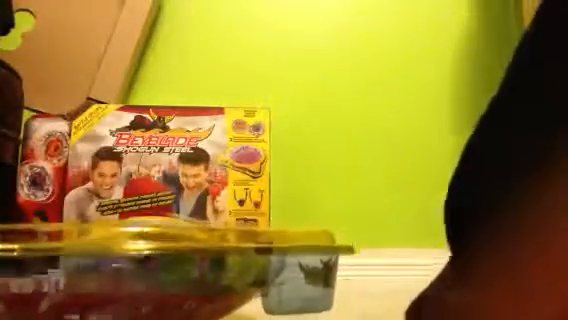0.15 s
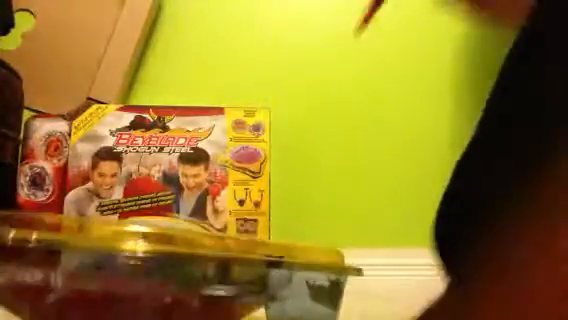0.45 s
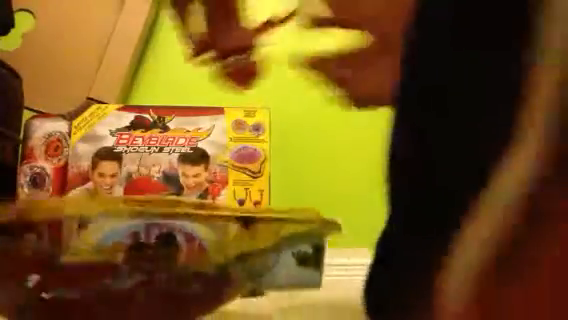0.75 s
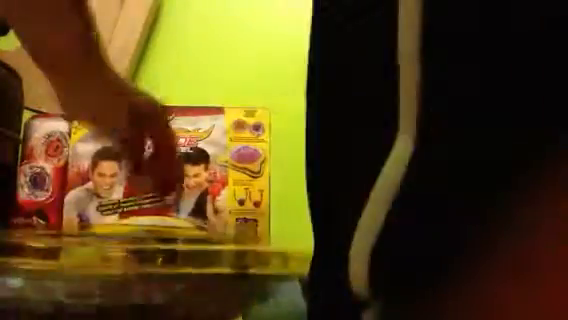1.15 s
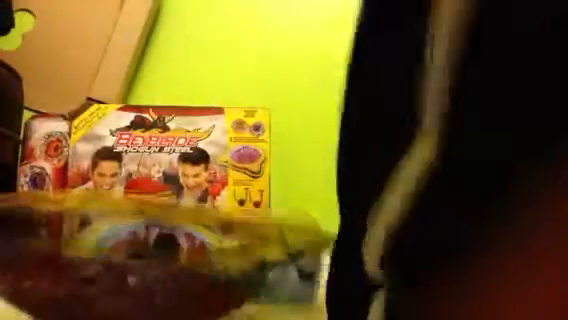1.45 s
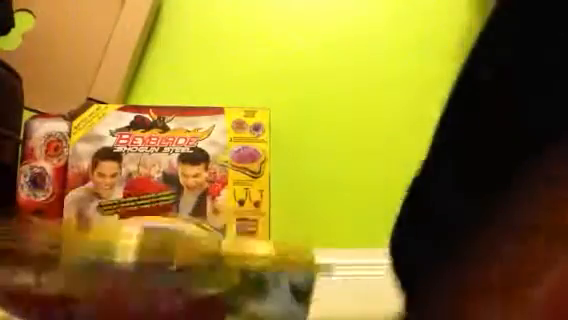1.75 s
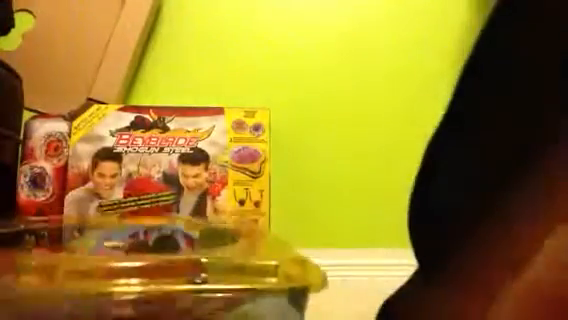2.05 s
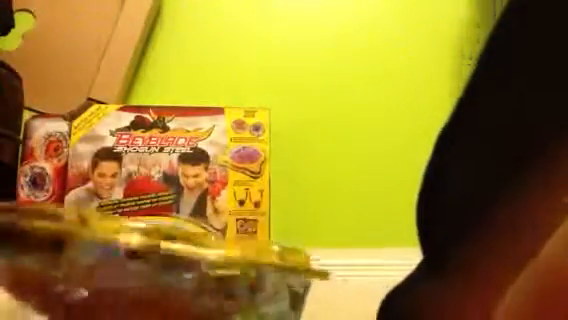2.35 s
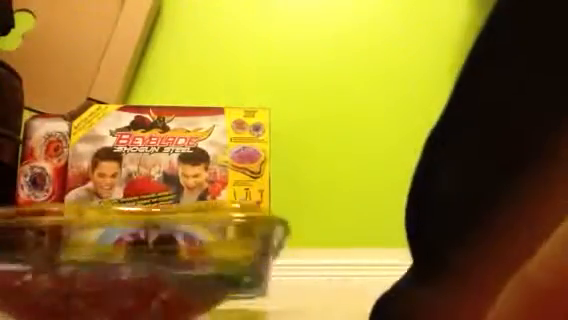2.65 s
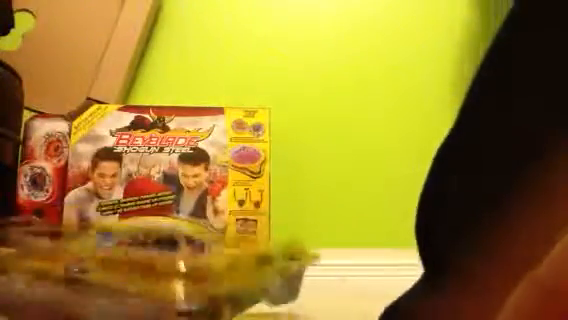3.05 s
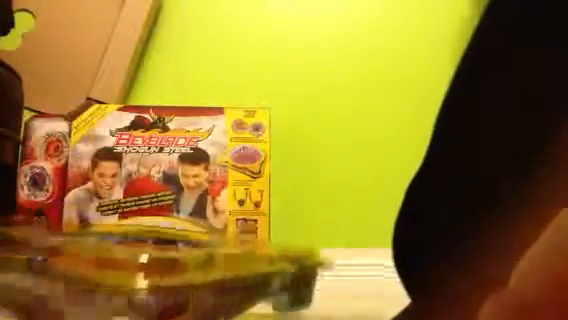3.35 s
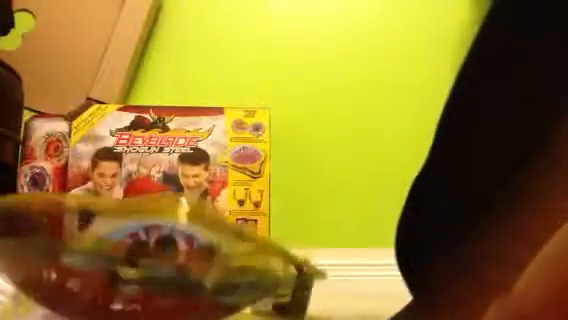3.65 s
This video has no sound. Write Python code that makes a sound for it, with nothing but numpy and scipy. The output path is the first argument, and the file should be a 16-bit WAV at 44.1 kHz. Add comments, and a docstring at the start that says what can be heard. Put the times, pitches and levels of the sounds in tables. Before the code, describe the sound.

A toy top whirrs softly in a plastic arena, a launcher clicks, its toothed cord zips, and a second top drops in; both rattle and knock ever more densely, close to an overloaded microphone in a small room.

```python
"""A whirr is heard first: a toy top runs round a thin plastic arena on the floor of a small room, as a launcher snaps.
A toothed cord rips through the launcher, and a second top drops in and bounces; the two rattle round the dish,
knock against its wall and clash. Friction and impacts are noise grains through the colours of the parts,
with decaying sines for dish, wall and rim. Dense reflections follow; a close, overloaded microphone rounds the peaks."""
import sys
import numpy as np
from scipy import signal
from scipy.fft import rfft, irfft
from scipy.io import wavfile

SR = 44100
rng = np.random.default_rng(int(sys.argv[2]) if len(sys.argv) > 2 else 0)


def wav_record(signal):
    """Record a signal, one row per channel, as 16-bit PCM in the file named by sys.argv[1]."""
    frames = np.transpose(np.atleast_2d(signal))
    bounded = np.clip(frames, -1, 1)
    # unit amplitude maps onto the largest positive 16-bit level
    quanta = np.round(bounded * 32767).astype(np.int16)
    wavfile.write(sys.argv[1], SR, quanta)


N = 167580
TIME = np.arange(N) / SR
SHORT = TIME[:6000]  # time axis of one short sound
LEVEL_S = .01  # a short sound at 0 dB has the energy of unit rms over this time
GRAINS_PER_S = 3200


def from_db(db):
    """Logarithmic level: decibels become an amplitude factor."""
    return 10 ** (np.asarray(db) / 20)


def rms_one(x):
    """Power normalisation: scale to unit rms."""
    return x / np.sqrt(np.mean(x ** 2) + 1e-20)


def unit_burst(x):
    """Energy normalisation: scale a short sound to the energy of unit rms over LEVEL_S."""
    return x / np.sqrt(np.sum(x ** 2) / (LEVEL_S * SR) + 1e-20)


def in_time(rows):
    """Linear interpolation: timed rows become control curves, one value per sample."""
    times_s, *columns = np.transpose(rows)
    return [np.interp(TIME, times_s, column) for column in columns]


def add(out, start_s, x):
    """Superposition: mix x into out from its start time."""
    i = int(start_s * SR)
    out[i:i + len(x)] += x[:N - i]


def body(points, size=4096):
    """Minimum phase: folding the cepstrum gives a causal impulse response with the given colour."""
    points_hz, points_db = np.transpose(points)
    log_hz = np.log(np.fft.rfftfreq(size, 1 / SR) + 1)
    log_gain = np.log(from_db(np.interp(log_hz, np.log(points_hz), points_db)))
    cepstrum = irfft(log_gain)
    cepstrum[1:size // 2] *= 2
    cepstrum[size // 2 + 1:] = 0
    return irfft(np.exp(rfft(cepstrum)))[:size // 2]


def through(x, response):
    """Linear excitation: convolve x with an impulse response."""
    return signal.fftconvolve(x, response)[:len(x)]


def resonate(x, hz, width_hz):
    """Damped resonance: a pole pair whose radius sets the bandwidth."""
    radius = np.exp(-np.pi * width_hz / SR)
    poles = [1, -2 * radius * np.cos(2 * np.pi * hz / SR), radius ** 2]
    return signal.lfilter([1, 0, -1], poles, x)


def grains(count):
    """Asperity noise: sparse tiny impacts of random size and sign over a fainter steady noise."""
    impacts = rng.random(count) < GRAINS_PER_S / SR
    return rng.standard_normal(count) * (0.16 + impacts)


def contact(rise_s, hold_s, fall_s):
    """Contact force: exponential approach from zero, with exponential release after the hold."""
    attack = 1 - np.exp(-SHORT / rise_s)
    release = np.exp(-np.maximum(SHORT - hold_s, 0) / fall_s)
    return attack * release


def blend(tone, noise, share):
    """Energy partition: a short sound of unit energy, mixed with the given energy share for the tone."""
    return unit_burst(np.sqrt(share) * unit_burst(tone) + np.sqrt(1 - share) * unit_burst(noise))


def pulsing(rate, jitter, fall_s, spread_db, floor, count):
    """Quasi-periodic excitation: jittered jolts die away over a steady pressure; rms 1."""
    draws = rng.standard_normal((count, 2))
    at = ((np.arange(count) + jitter * draws[:, 0]) / rate * SR).astype(int)
    keep = (at >= 0) & (at < N)
    jolts = np.zeros(N)
    jolts[at[keep]] = from_db(spread_db * np.clip(draws[keep, 1], -2, 2))
    dying = signal.lfilter([1], [1, -np.exp(-1 / (fall_s * SR))], jolts)
    return rms_one(floor + dying)


# The tips running on the dish, quieter while a top is in the air.
# Each row: time in seconds, level of the rumble in dB, level of the hiss in dB.
RUNNING_LEVELS = [(0, -36, -43), (.17, -33.5, -54), (.3, -29, -45), (.45, -30.5, -46), (.59, -26.5, -41.5),
                  (.68, -33, -50), (.8, -32.5, -50.5), (.97, -33, -53), (1.08, -30.5, -45),
                  (1.3, -32.5, -39), (1.345, -33, -51), (1.42, -21.5, -37), (1.5, -31, -39),
                  (1.545, -28, -51), (1.6, -30, -39), (1.69, -26.5, -48), (1.76, -27, -43),
                  (1.805, -45, -58), (1.84, -29, -47), (2.0, -25, -38.5), (2.12, -25, -44.5),
                  (2.21, -26, -44.5), (2.28, -23, -38), (2.39, -37, -44), (2.55, -26.5, -46),
                  (2.68, -34, -52.5), (2.76, -31.5, -48), (2.83, -26, -45), (3.1, -24, -36.5),
                  (3.33, -27.5, -37.5), (3.43, -31, -44), (3.6, -40, -45), (3.8, -31, -49.5)]
# Colour of the dish's rumble. Each row: frequency in Hz, relative level in dB per Hz.
RUMBLE_COLOUR = [(25, -39), (70, -32), (100, -19.5), (130, -5), (195, 3), (240, 0.5), (310, -6),
                 (400, -5.5), (500, 0), (600, -3.5), (720, -10), (880, -3.5), (1000, -9), (1200, -14),
                 (1400, -16), (1550, -15), (2000, -20.5), (2800, -31), (5000, -34), (16000, -58)]
# Colour of the fine scratch. Each row: frequency in Hz, relative level in dB per Hz.
HISS_COLOUR = [(700, -18), (2500, -1.5), (3700, 0), (4800, -1.5), (6300, 1.5), (8500, -1), (11500, 0.5),
               (15300, -6.5)]


def running():
    """Rolling and sliding friction: wobbling tips bump along the rumbling dish; each turn adds a fine scratch."""
    rumble_db, hiss_db = in_time(RUNNING_LEVELS)
    bumps = pulsing(rate=45, jitter=.22, fall_s=0.0089, spread_db=3, floor=0.49, count=260)
    turns = pulsing(rate=114, jitter=.1, fall_s=0.00093, spread_db=7, floor=1, count=650)
    rumble = rms_one(through(rng.standard_normal(N) * bumps, body(RUMBLE_COLOUR)))
    scratch = grains(N) * turns * np.sqrt(np.abs(bumps))
    hiss = rms_one(through(scratch, body(HISS_COLOUR)))
    return from_db(rumble_db) * rumble + from_db(hiss_db) * hiss


CONTACT_RISE_S = 0.00031  # shared by the cord's jolt and the blows
# The launcher is handled and latches.
# Each row: start in seconds, level in dB, ring frequency in Hz, fall time in seconds.
LAUNCHER_SNAPS = [(.0085, -20, 5350, 0.0017), (0.023, -31, 3350, 0.0026), (0.264, -36, 3750, 0.0026),
                  (0.379, -37, 4200, 0.028), (1.113, -24, 11400, 0.0033), (1.162, -18, 5400, 0.0019),
                  (1.167, -21.5, 2600, 0.0016)]
SNAP_RING_SHARE, SNAP_WIDTH_HZ = .45, 500  # energy share and bandwidth of the ring
# The pull of the toothed cord.
# Each row: time in seconds, level in dB, teeth per second, pitch of the gear's whine in Hz.
CORD_PULL = [(1.08, -49, 300, 3863), (1.11, -34, 360, 3944), (1.125, -22, 550, 3716),
             (1.154, -21.5, 700, 3400), (1.162, -12, 770, 4335), (1.172, -13.5, 2600, 5000),
             (1.186, -21.5, 630, 5390), (1.208, -22, 1000, 5270), (1.22, -38, 1100, 4940),
             (1.24, -59, 900, 5070)]
WHINE_SHARE, WHINE_WIDTH_HZ = .55, 900  # amplitude against the rasp, and bandwidth
# Colour of the launcher's housing. Each row: frequency in Hz, relative level in dB per Hz.
HOUSING_COLOUR = [(100, -25), (600, -31), (1800, -2.5), (3600, 1), (4400, -0.5), (5500, -3), (8000, 2),
                  (11000, 3), (13500, 2.5), (15500, -6.5)]
# Colour of the cord's jerk on the housing. Each row: frequency in Hz, relative level in dB per Hz.
JOLT_COLOUR = [(100, -7), (300, 8), (700, 0), (1500, 3), (2800, -7), (5000, -22), (15000, -35)]
CORD_JOLT_S, CORD_JOLT_DB, CORD_JOLT_FALL_S = 1.16, -18, 0.002  # the fall time is also the hold


def cord_zip(housing):
    """Ratchet modulation: a sawtooth at the tooth rate shapes noise, beside the gear's narrow-band whine."""
    level_db, teeth_per_s, whine_hz = in_time(CORD_PULL)
    tooth = 1 - np.cumsum(teeth_per_s) / SR % 1
    rasp = rms_one(through(rng.standard_normal(N) * tooth, housing))
    low_pass = signal.butter(2, WHINE_WIDTH_HZ / 2, fs=SR, output="sos")
    chatter = signal.sosfilt(low_pass, rng.standard_normal(N))
    whine = rms_one(chatter * np.sin(2 * np.pi * np.cumsum(whine_hz) / SR))
    pulled = TIME > CORD_PULL[0][0]
    return from_db(level_db) * pulled * rms_one(rasp + WHINE_SHARE * whine)


def launcher():
    """Impulsive excitation: small plastic snaps ring, the cord zips through and jerks the housing."""
    housing = body(HOUSING_COLOUR)
    out = cord_zip(housing)
    for start_s, snap_db, ring_hz, fall_s in LAUNCHER_SNAPS:
        crack = through(grains(len(SHORT)) * np.exp(-SHORT / fall_s), housing)
        ring = resonate(crack, ring_hz, SNAP_WIDTH_HZ)
        add(out, start_s, from_db(snap_db) * blend(ring, crack, SNAP_RING_SHARE))
    jerk = grains(len(SHORT)) * contact(CONTACT_RISE_S, CORD_JOLT_FALL_S, CORD_JOLT_FALL_S)
    jolt = through(jerk, body(JOLT_COLOUR))
    add(out, CORD_JOLT_S, from_db(CORD_JOLT_DB) * unit_burst(jolt))
    return out


# Blows on the arena, with levels as energy over LEVEL_S before the dish's low cut.
# Each row: start in seconds, contact length in seconds, pitch of the dish in Hz, pitch of the wall in Hz,
# level of the knock in dB, level of the clack in dB, level of the tick in dB.
ARENA_BLOWS = [(0.101, 0.013, 218, 800, -21.5, -41.5, -63), (1.04, 0.015, 188, 1040, -23.5, -51, -57),
               (1.212, 0.0021, 463, 760, -5, -22, -27), (1.22, 0.0048, 485, 1010, -13, -14.5, -27),
               (1.241, 0.014, 640, 805, -21, -16, -29), (1.308, 0.0062, 297, 823, -22.5, -25, -37),
               (1.356, 0.0018, 330, 970, -10.5, -16, -19.5), (1.368, 0.0055, 490, 900, -15.5, -20.5, -46),
               (1.396, 0.021, 486, 900, -17, -19.5, -16), (1.414, 0.0073, 340, 1010, -19.5, -18.5, -31),
               (1.455, 0.0068, 486, 970, -8, -15, -21.5), (1.553, 0.005, 347, 1500, -10, -24, -27),
               (1.568, 0.0039, 574, 1087, -12, -12.5, -25), (1.58, 0.0033, 323, 920, -25, -29, -30),
               (1.643, 0.0022, 216, 870, -8.5, -19, -30), (1.664, 0.014, 590, 1515, -19.5, -25.5, -34.5),
               (1.734, 0.0099, 193, 1020, -15, -26, -36.5), (1.816, 0.014, 200, 994, -20, -27.5, -38.5),
               (1.828, 0.0065, 505, 920, -19, -34, -44), (1.893, 0.027, 460, 898, -22, -27.5, -41),
               (2.048, 0.0031, 392, 986, -23, -30, -41), (2.064, 0.021, 580, 914, -12.5, -17.5, -24.5),
               (2.156, 0.03, 585, 852, -23, -25, -34), (2.233, 0.014, 190, 780, -29, -25.5, -43),
               (2.257, 0.015, 328, 867, -22, -25, -37), (2.303, 0.0015, 550, 1550, -17, -23.5, -29),
               (2.331, 0.015, 484, 1820, -18, -30, -34.5), (2.345, 0.014, 215, 814, -15.5, -20, -30),
               (2.413, 0.006, 200, 1010, -14, -25, -33), (2.466, 0.018, 190, 880, -19.5, -24.5, -37.5),
               (2.501, 0.013, 208, 915, -20.5, -32, -57), (2.714, 0.01, 220, 994, -31, -33, -44),
               (2.773, 0.0035, 516, 970, -23.5, -45, -58), (2.792, 0.0091, 330, 820, -21, -27, -28),
               (2.88, 0.0085, 473, 1050, -17, -21, -26), (2.888, 0.011, 500, 780, -17.5, -25, -30),
               (2.925, 0.0018, 472, 1000, -9, -20.5, -30), (2.95, 0.0087, 473, 790, -12.5, -20.5, -26.5),
               (2.981, 0.0035, 467, 1034, -9.5, -16, -24.5), (2.993, 0.0036, 340, 1170, -16, -19, -22.5),
               (3.003, 0.018, 481, 895, -9, -18.5, -26), (3.054, 0.0066, 408, 840, -9, -15, -21),
               (3.075, 0.016, 366, 890, -26, -20.5, -33), (3.143, 0.006, 386, 1690, -16, -14.5, -20),
               (3.18, 0.0049, 520, 1015, -10.5, -18, -23.5), (3.231, 0.0039, 290, 950, -24, -19, -24.5),
               (3.241, 0.0046, 328, 1150, -16.5, -21.5, -38), (3.286, 0.0052, 684, 877, -16, -10.5, -21.5),
               (3.352, 0.0066, 615, 930, -10, -17, -29), (3.366, 0.012, 523, 940, -21, -30, -29),
               (3.397, 0.0068, 517, 895, -28, -27, -33.5), (3.449, 0.01, 647, 1030, -9, -20, -30),
               (3.469, 0.007, 524, 805, -13, -10.5, -19), (3.475, 0.0027, 470, 940, -30, -31, -44),
               (3.529, 0.002, 453, 1120, -17.5, -13.5, -33), (3.533, 0.0096, 383, 1570, -14.5, -22, -37),
               (3.56, 0.007, 348, 807, -8.5, -15, -26.5), (3.58, 0.005, 626, 1450, -17, -15, -21.5),
               (3.592, 0.003, 544, 897, -14, -15, -27), (3.61, 0.0023, 560, 1260, -15, -20, -28),
               (3.659, 0.012, 392, 1538, -10, -21, -27), (3.692, 0.0025, 550, 1153, -11, -16, -34.5),
               (3.764, 0.006, 423, 884, -14, -19, -33.5)]
# Colour of the dish's panel. Each row: frequency in Hz, relative level in dB per Hz.
PANEL_COLOUR = [(30, -11), (80, -43.5), (160, -7), (250, -6.5), (340, 2), (480, 2), (600, -2), (800, -13),
                (1400, -37), (4000, -54)]
# Colour of the wall. Each row: frequency in Hz, relative level in dB per Hz.
WALL_COLOUR = [(200, -9.5), (600, -37), (720, -4), (880, 4), (1150, -5), (1350, -4.5), (1600, -7),
               (2000, -11), (2800, -18.5), (5000, -35), (16000, -57)]
# Colour of the hard rim. Each row: frequency in Hz, relative level in dB per Hz.
EDGE_COLOUR = [(500, -9), (2000, -4), (3200, -1), (5000, 0), (6500, 0.5), (9000, -2), (12000, -3),
               (15500, -8.5)]
KNOCK_RISE_S, KNOCK_FALL_S = 0.0019, 0.0048
CLACK_FALL_S, WALL_FALL_S = 0.0049, 0.0066
TICK_FALL_S, CRACK_FALL_S = 0.0076, 0.002
# energy shares: panel noise in the knock, wall ring in the clack, first touch in the tick
PANEL_SHARE, WALL_RING_SHARE, CRACK_SHARE = 0.41, 0.42, 0.12
DISH_LOW_HZ = 127  # the small dish radiates little below this


def blows():
    """Impact with brief grinding: the dish knocks, the wall clacks, the hard rim ticks."""
    out = np.zeros(N)
    panel, wall, edge = body(PANEL_COLOUR), body(WALL_COLOUR), body(EDGE_COLOUR)
    for start_s, contact_s, dish_hz, wall_hz, knock_db, clack_db, tick_db in ARENA_BLOWS:
        hold_s = contact_s / 2
        flex = contact(KNOCK_RISE_S, hold_s, KNOCK_FALL_S) * np.sin(2 * np.pi * dish_hz * SHORT)
        ring = contact(CONTACT_RISE_S, hold_s, WALL_FALL_S) * np.sin(2 * np.pi * wall_hz * SHORT)
        press = contact(CONTACT_RISE_S, hold_s, CLACK_FALL_S)
        knock = blend(flex, through(grains(len(SHORT)) * press, panel), 1 - PANEL_SHARE)
        clack = blend(ring, through(grains(len(SHORT)) * press, wall), WALL_RING_SHARE)
        grind = grains(len(SHORT)) * contact(CONTACT_RISE_S, hold_s, TICK_FALL_S)
        touch = grains(len(SHORT)) * np.exp(-SHORT / CRACK_FALL_S)
        tick = blend(through(touch, edge), through(grind, edge), CRACK_SHARE)
        add(out, start_s, from_db(knock_db) * knock + from_db(clack_db) * clack + from_db(tick_db) * tick)
    low_cut = signal.butter(2, DISH_LOW_HZ, "high", fs=SR, output="sos")
    return signal.sosfilt(low_cut, out)


# Modes of the dropped top's metal rim. Each row: frequency in Hz, mean relative level in dB.
RIM_MODES = [(5017, 2), (5235, -12), (9210, -7), (10410, 0), (10926, 1), (12255, -5)]
# Strokes that set the rim ringing. Each row: start in seconds, level in dB added to each mode's own.
RIM_STROKES = [(1.212, -41), (1.357, -34), (1.553, -46), (1.643, -58), (3.142, -52)]
RIM_T60_S = 0.26  # time to decay by 60 dB


def rim():
    """Modal vibration: inharmonic sines with one decay, their levels and phases varying by stroke."""
    out, t = np.zeros(N), TIME[:SR]
    for start_s, stroke_db in RIM_STROKES:
        modes = np.zeros(len(t))
        for hz, mode_db in RIM_MODES:
            gain = from_db(mode_db + rng.normal(0, 2.2))
            modes += gain * np.sin(2 * np.pi * (hz * t + rng.random()))
        add(out, start_s, modes * from_db(stroke_db - 60 * t / RIM_T60_S))
    return out


# The tops' metal rims clash. Each row: start in seconds, level in dB, ring frequency in Hz.
RIM_CLASHES = [(2.790, -29, 8100), (2.793, -26.5, 7260), (2.795, -31, 4600), (2.862, -33, 6900),
               (2.88, -27, 6530), (2.888, -33, 7600), (2.895, -38, 6900), (3.142, -17.5, 7700)]
CLASH_WIDTH_HZ, CLASH_FALL_S = 1900, 0.0024


def clashes():
    """Heavily damped resonance: metal on metal gives short bright chinks through two broad filters."""
    out = np.zeros(N)
    for start_s, level_db, ring_hz in RIM_CLASHES:
        scrape = grains(len(SHORT)) * np.exp(-SHORT / CLASH_FALL_S)
        ringing = resonate(scrape, ring_hz, CLASH_WIDTH_HZ)
        chink = resonate(ringing, ring_hz, 2 * CLASH_WIDTH_HZ)
        add(out, start_s, from_db(level_db) * unit_burst(chink))
    return out


# Bands of the reverberation.
# Each row: low edge in Hz, high edge in Hz, time to decay by 60 dB in seconds, level in dB.
ROOM_BANDS = [(93, 310, 0.15, -5.5), (310, 730, .3, -7.5), (750, 3730, 0.29, -8), (2470, 14000, 0.16, -11)]
ROOM_DELAY_S = 0.0038
RUN_WET = 0.99  # gain of the running tops into the room


def room(x):
    """Diffuse reverberation: dense reflections from the arena's cover and near walls, dying band by band."""
    t, tail = TIME[:SR // 2], 0
    for low_hz, high_hz, t60_s, level_db in ROOM_BANDS:
        band_pass = signal.butter(2, [low_hz, high_hz], "band", fs=SR, output="sos")
        band = signal.sosfilt(band_pass, rng.standard_normal(len(t)))
        band = band * from_db(-60 * t / t60_s) * (t > ROOM_DELAY_S)
        bandwidth_share = (high_hz - low_hz) / (SR / 2)
        tail = tail + from_db(level_db) * band * np.sqrt(bandwidth_share / np.sum(band ** 2))
    return through(x, tail)


def scene():
    """Superposition of direct and reflected sound: running tops, launcher, blows, rim and clashes."""
    run = running()
    strikes = launcher() + blows() + rim() + clashes()
    return (strikes + run + room(strikes + RUN_WET * run))[None]


OVERLOAD = .76  # amplitude that the rounded peaks approach
CUTOFF_HZ = 15400


def record(dry):
    """Saturation and band limiting: peaks are rounded off and the top of the spectrum is cut."""
    rounded = dry / (1 + (dry / OVERLOAD) ** 4) ** .25
    top_cut = signal.ellip(12, .2, 80, CUTOFF_HZ, fs=SR, output="sos")
    return signal.sosfilt(top_cut, rounded)


dry = scene()
out = record(dry)
wav_record(out)
```